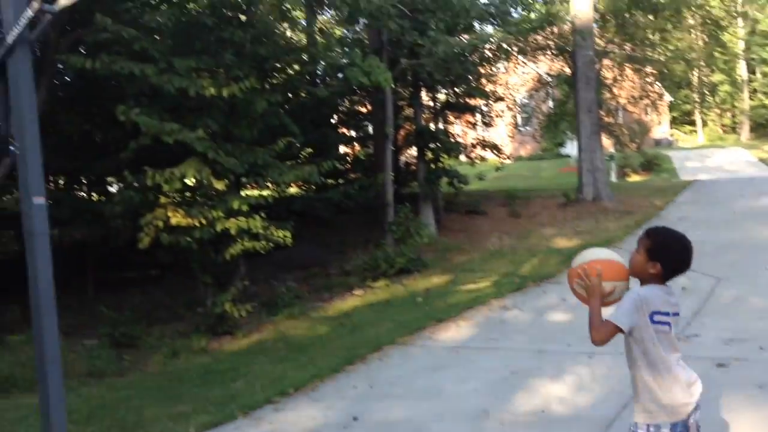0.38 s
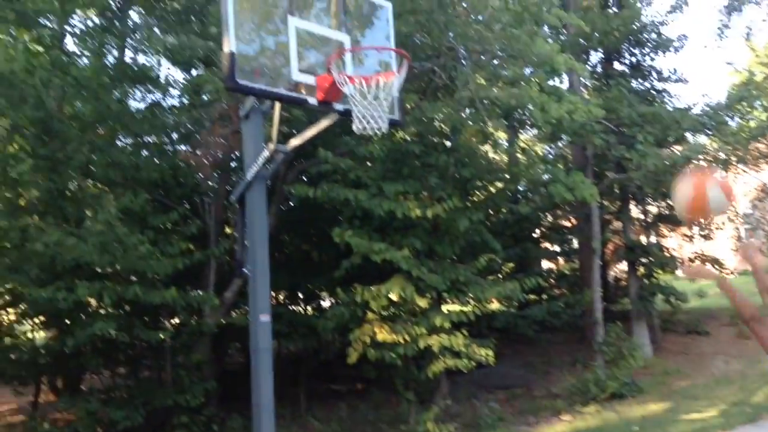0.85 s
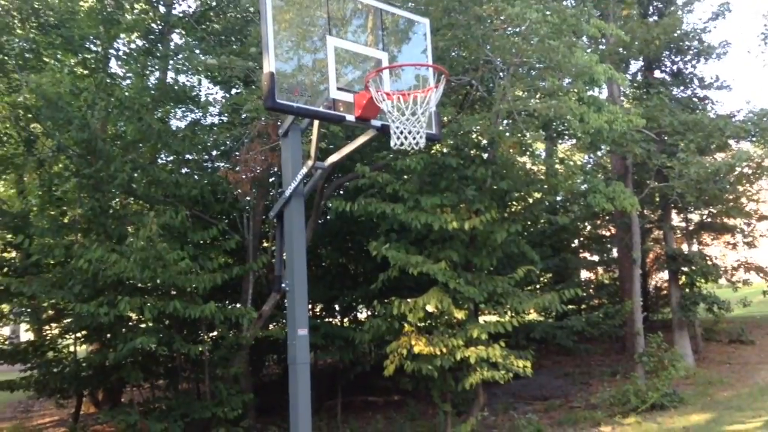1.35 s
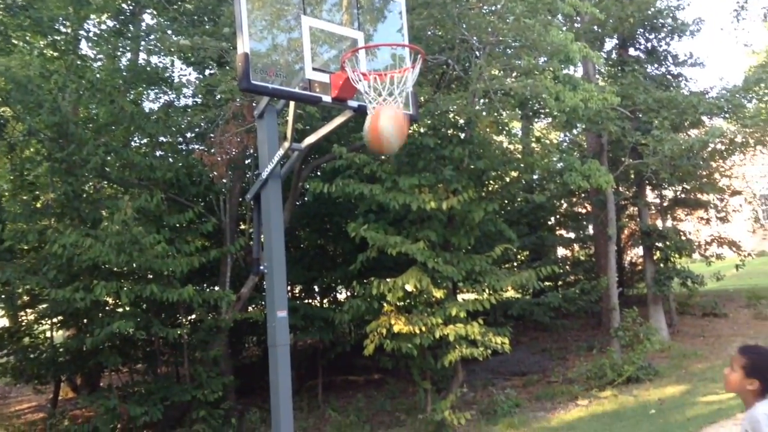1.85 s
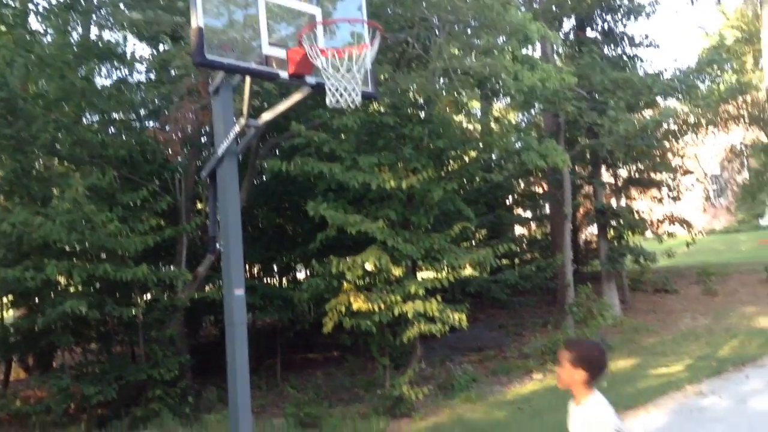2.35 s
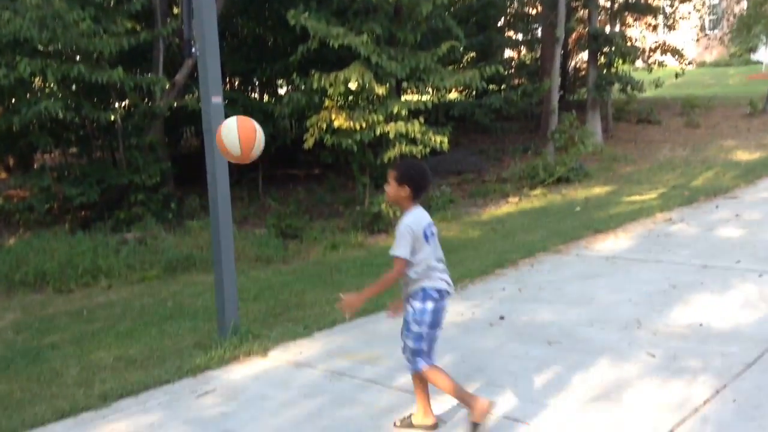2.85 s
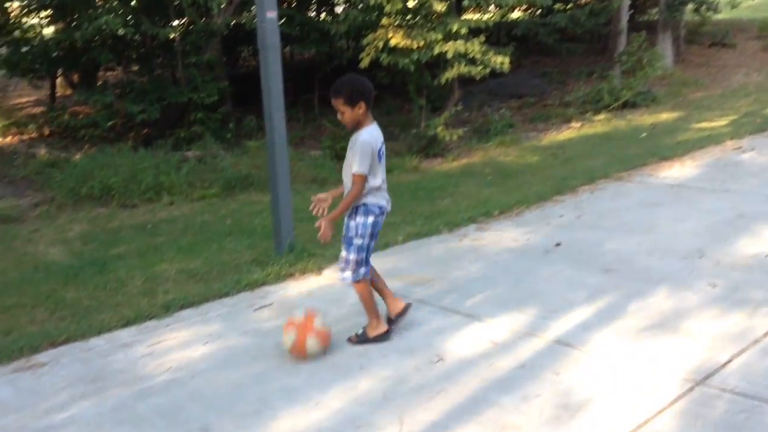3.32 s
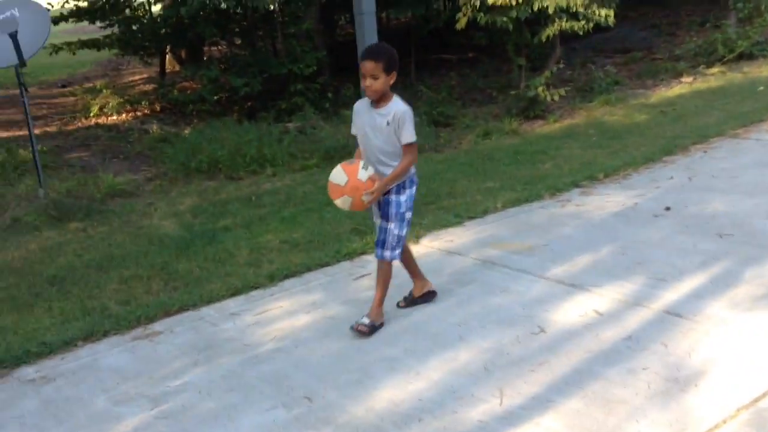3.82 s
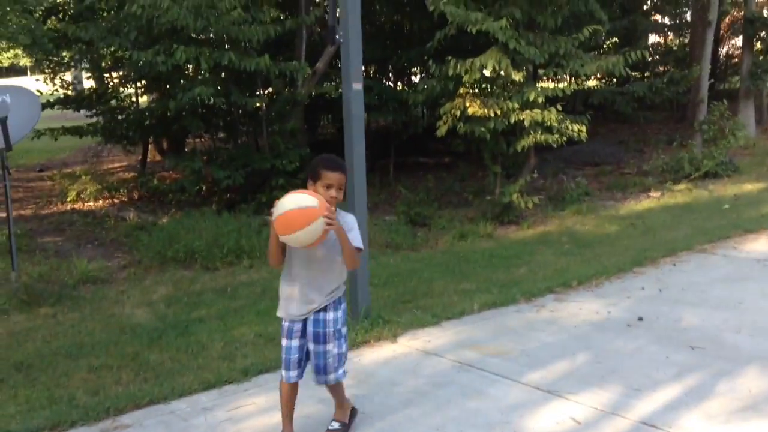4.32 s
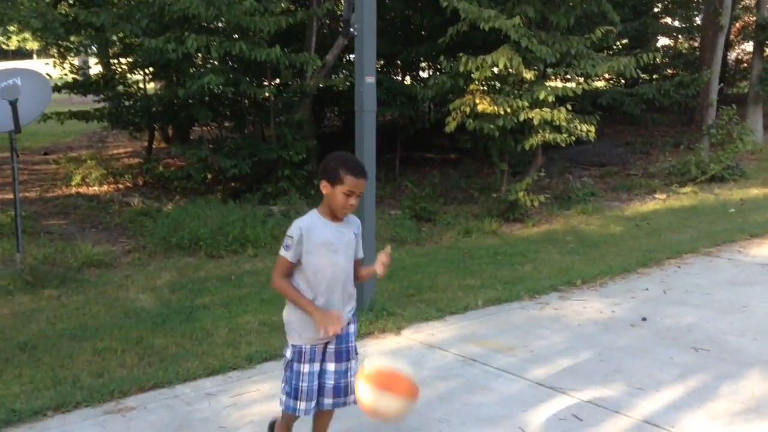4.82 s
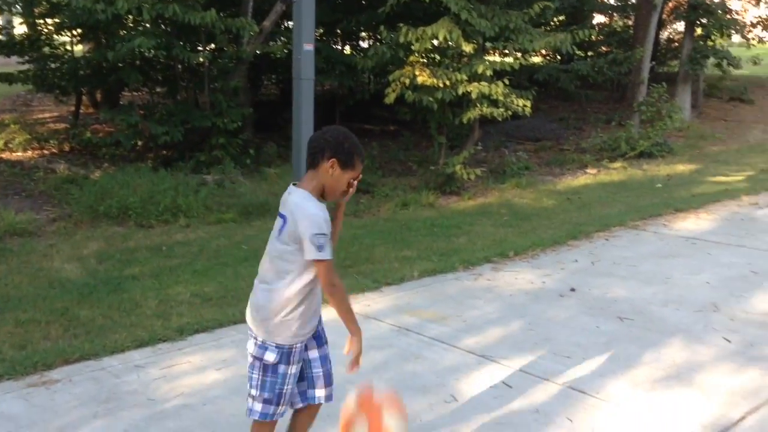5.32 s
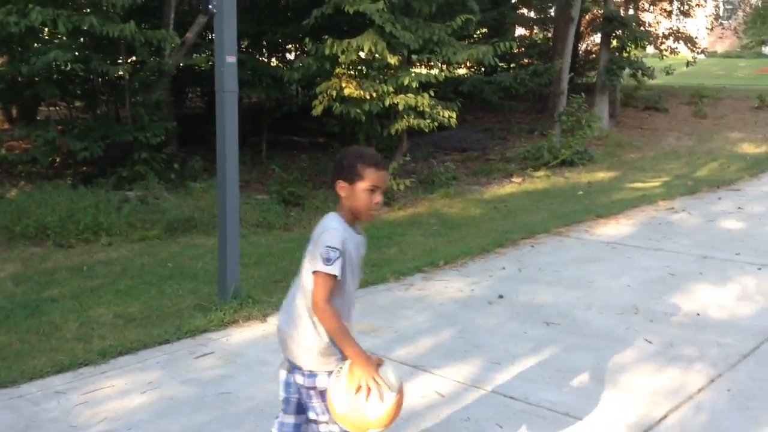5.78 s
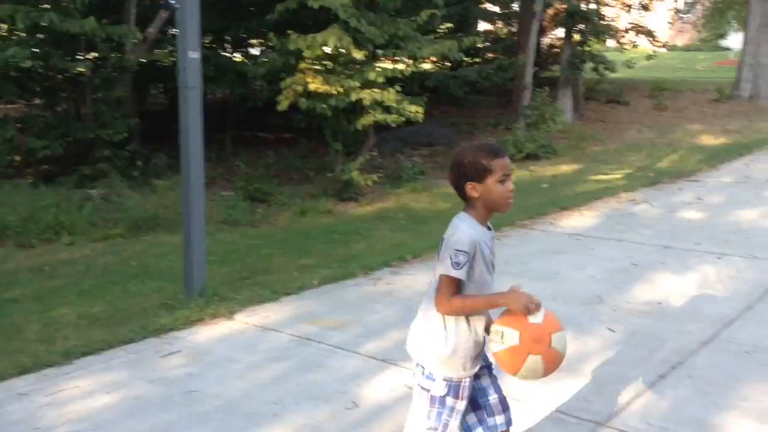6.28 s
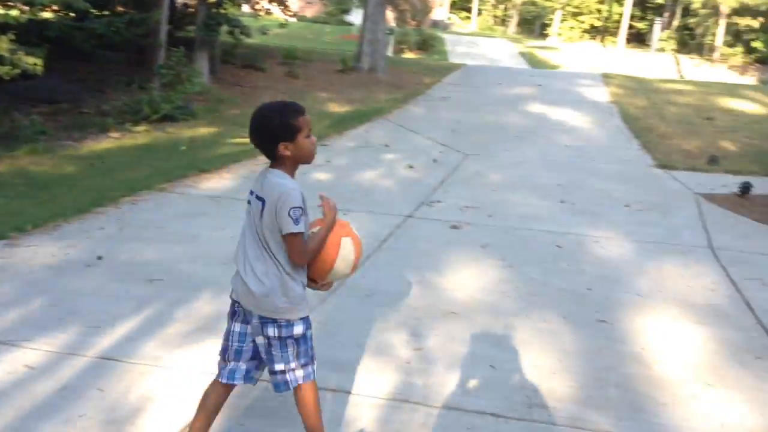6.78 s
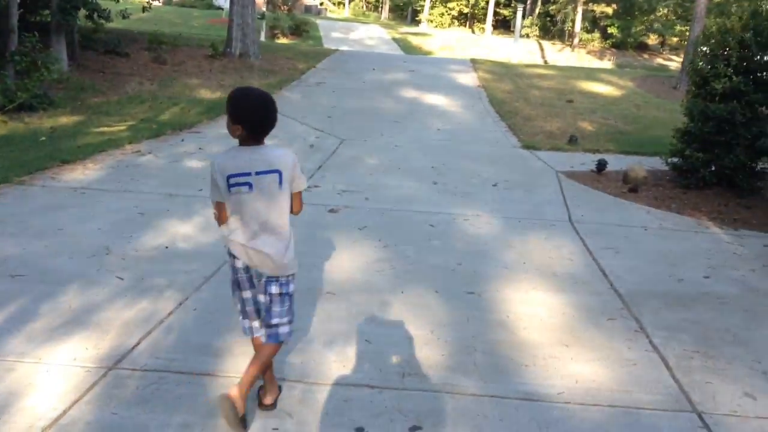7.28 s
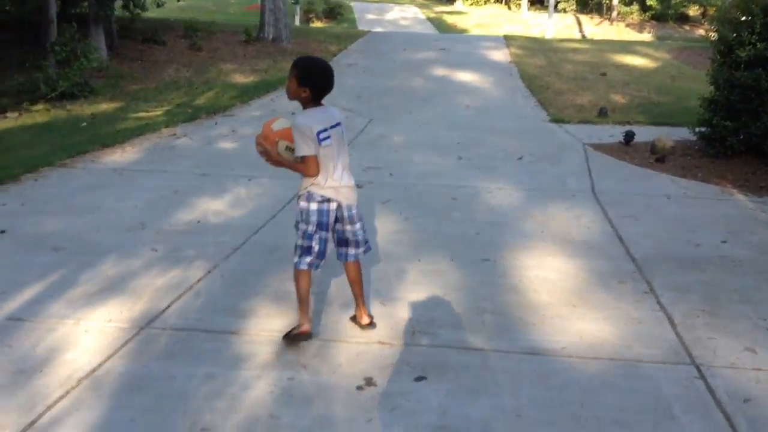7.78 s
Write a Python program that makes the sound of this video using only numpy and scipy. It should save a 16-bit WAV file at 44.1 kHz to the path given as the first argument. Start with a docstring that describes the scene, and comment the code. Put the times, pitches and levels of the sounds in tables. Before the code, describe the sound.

Sandal claps and gritty shuffles open the scene, before a bouncing rubber ball cracks on concrete, pinging hollowly. Two bounces come about a second apart, then two closer together after more steps; only footwork follows. Each hit has a slap-back off a nearby wall and a thin airy tail from trees. Faint traffic, rustling leaves, insects and distant gliding whistles remain underneath, heard through a small, bright, bass-light microphone.

```python
"""Ball and sandals on a drive

A rubber ball bounces on a concrete drive: spikes, fizz and ringing modes of its air and shell.
Loose sandals slap (ticks and hollow claps) and scuff (grainy hiss) between the bounces.
The house wall gives one echo, the yard and trees a longer noise tail; faint high tones follow some bounces.
Behind lie shaped noise for far traffic, leaves and insects, and a distant bird's gliding whistles."""
import sys
import numpy as np
from scipy import signal
from scipy.fft import rfft, irfft, next_fast_len
from scipy.io import wavfile
from scipy.ndimage import map_coordinates

SR = 44100
rng = np.random.default_rng(int(sys.argv[2]) if len(sys.argv) > 2 else 0)


def linear_from_db(decibels):
    """Turn decibels (scalar or array-like) into linear amplitude factors; 0 gives 1."""
    return 10 ** (np.asarray(decibels, float) / 20)


def to_wav(sig):
    """Store sig (one row per channel, or 1-D mono) as 16-bit WAV at the path in sys.argv[1].

    Samples outside -1..1 are clipped; the rate is SR.
    """
    pcm = np.clip(np.atleast_2d(sig), -1, 1) * 32767
    pcm = np.round(pcm).astype(np.int16)
    wavfile.write(sys.argv[1], SR, pcm.T)  # frames by channels


N = 348047  # length in samples

# Noise colours of far traffic and of leaves with insects, relative density: f/Hz, level/dB
TRAFFIC_COLOUR = [(12, -80), (20, -50), (32, -45), (48, -15.5), (81, -45), (102, -7.5), (162, -7.5),
                  (193, -6), (237, -1), (298, -6.5), (360, -7), (420, -15.5), (550, -43), (920, -120)]
LEAVES_COLOUR = [(280, -22), (480, -1.5), (539, -2.5), (596, -2), (1370, -2), (1500, -8), (1750, -4.5),
                 (2660, -10), (2900, -6), (3120, -11), (3450, -8.5), (6600, -11.5), (7620, -4),
                 (15000, -24)]
# Ambience levels before their small wobble: t/s, traffic level/dB, leaves and insects level/dB
AMBIENCE_LEVELS = [(0, -48, -46.5), (2, -48.5, -47), (4, -47.5, -47), (6, -47.5, -47), (7.3, -47.5, -46.5),
                   (7.89, -47, -47)]
# Bird whistles, nominal level before the fuzz: t/s, length/s, from f/Hz, to f/Hz, level/dB
BIRD_WHISTLES = [(0.335, 0.31, 3900, 2840, -55), (1.78, 0.37, 3900, 2600, -54),
                 (7.26, 0.355, 2900, 2960, -58.5), (7.47, .06, 3200, 3500, -55),
                 (7.6, .07, 4000, 4400, -54)]
# Faint high tones after a bounce, level before its wobble: from t/s, to t/s, f/Hz, level/dB
THIN_TONES = [(2.517, 2.774, 2930, -53), (4.84, 5.2, 2230, -51), (5.5, 5.755, 2245, -59)]
# Soles dragging on grit, nominal level; weight lifts the low part: t/s, level/dB, rise/s, hold/s, weight/dB
SCUFF_STROKES = [(0.221, -37, 0.019, 0.023, 8.5), (0.573, -36.5, .003, 0.01, 5),
                 (0.636, -27, 0.012, 0.014, -5.5), (0.818, -50, .0055, .015, 7),
                 (1.183, -56, .0044, 0.026, 11), (1.228, -44, .005, 0.024, 2),
                 (1.625, -39.5, 0.045, 0.021, 3), (2.646, -42.5, .01, 0.09, -0.5),
                 (3.114, -36, 0.025, 0.021, 0), (3.514, -35.5, 0.01, 0.025, 3),
                 (3.864, -42, .004, 0.028, -15), (4.273, -39.5, .011, 0.034, 2.5),
                 (4.637, -30, 0.024, 0.011, 2.5), (5.039, -27.5, 0.015, 0.034, 4.5),
                 (5.441, -27.5, .0023, 0.015, 6), (5.776, -47, .035, .02, 3),
                 (5.845, -35.5, .0045, 0.034, -1), (6.31, -39.5, .012, 0.032, -4),
                 (6.771, -36.5, .015, 0.059, -1), (7.207, -31.5, .004, 0.049, -2.5),
                 (7.655, -44, .01, .03, 0.5), (7.727, -45.5, 0.03, 0.076, 4.5)]
# Noise colour of crushed grit, relative density: f/Hz, level/dB
GRIT_COLOUR = [(880, -19), (1500, -13.5), (2550, -6), (2810, -9), (3430, -6.5), (5780, -6.5), (9360, 1.5),
               (15000, -12.5)]
# Soles hitting heel or ground, and one low thud of the ball at 2.677 s:
# t/s, nominal tick peak level/dB, clap peak level/dB, clap pitch f/Hz
TAP_HITS = [(0.2268, -24.5, -31, 3400), (.575, -30, -26.5, 527), (0.5812, -10.5, -12.5, 2040),
            (.638, -33, -33, 440), (0.829, -31, -31.5, 3700), (1.186, -27, -32, 1100),
            (1.215, -42, -30, 486), (1.2223, -13, -15, 1800), (1.7467, -31.5, -45, 3700),
            (2.289, -31, -50, 4500), (2.6524, -21.5, -36, 3500), (2.67, -22, -27, 2200),
            (2.677, -45, -26, 236), (2.7126, -23, -29.5, 4500), (3.0865, -18, -25, 4030),
            (3.1138, -27, -50, 4000), (3.668, -29, -43, 4000), (3.8666, -23, -47, 4000),
            (4.2623, -26, -34, 3600), (4.284, -22.5, -32, 3650), (4.307, -22, -22, 3780),
            (4.4533, -29.5, -47, 1800), (4.6414, -21.5, -31, 3500), (5.04, -13.5, -15.5, 4120),
            (5.26, -38, -36, 705), (5.8256, -24, -28.5, 4040), (5.8524, -24, -28, 4040),
            (6.2909, -17, -32.5, 1300), (6.3095, -17.5, -28.5, 4500), (6.4118, -26.5, -47, 4500),
            (6.754, -16, -25, 3460), (6.772, -35, -29, 5000), (6.7816, -22, -23.5, 4230),
            (6.8394, -22, -35, 3500), (7.208, -24, -35.5, 1050), (7.2504, -29, -46, 4000),
            (7.77, -45, -37, 1300), (7.81, -45, -36, 1100)]
# Noise colour of the tick, relative density: f/Hz, level/dB
TICK_COLOUR = [(1200, -52), (2500, -29), (5000, -12.5), (9000, 8), (12000, -1), (15000, -12), (20000, -40)]
# Cupped air under the sole: pitch/ratio to clap pitch, bandwidth/ratio to clap pitch, level/dB
SOLE_CUP = [(.55, 0.26, -3), (1, 0.49, 8), (1.55, 0.95, -11.5)]
# Wall echo of the taps as the feet move about: t/s, level/dB
FEET_ECHO_LEVELS = [(0, -7.5), (1.3, -4.5), (1.7, -16), (4.3, -24), (7.89, -21)]
# Bounces: landing t/s, slap level/dB, contact/s, landing shell thump level/dB, lift-off air ring level/dB
BALL_BOUNCES = [(2.3284, 2.5, .0143, -12, -4.5), (3.3857, 1.5, 0.011, -22, -19),
                (4.7709, 0, .0133, -16.5, -12.5), (5.45, -3, 0.014, -15, -22)]
# Ringing modes of the air inside the ball, relative level: f/Hz, level/dB, t60/s
AIR_MODES = [(590, -4.5, 0.026), (760, 0, 0.013), (836, 2, 0.018), (1001, -12, .13), (1037, 3, 0.024),
             (957, -29, 0.14), (1152, -9.5, 0.068), (1310, -1, 0.039), (1520, -13, 0.016),
             (1740, -12, 0.028), (2540, -15, 0.014)]
# Ringing modes of the rubber shell, relative level: f/Hz, level/dB, t60/s
SHELL_MODES = [(111, -6, 0.044), (180.3, -6.5, 0.11), (227.4, 3, 0.062), (313, 8, 0.022), (400, 1.5, 0.05),
               (500, -3.5, 0.025)]
# Noise colour of the fizz with a slap, relative density: f/Hz, level/dB
FIZZ_COLOUR = [(880, -62), (1500, 11.5), (5300, 4.5), (6810, 4), (7790, 12.5), (8830, -6.5), (10400, 11.5),
               (15000, -69)]
# Diffuse yard tail, relative level: f/Hz, t60/s, level/dB
YARD_BANDS = [(150, 0.99, -16.5), (400, 0.36, -14), (1010, 0.75, -16.5), (1590, 0.59, -11.5),
              (2930, 0.62, -7), (7800, 0.56, -9), (15000, 0.4, -6)]
# Late echoes from the trees, relative level: delay t/s, level/dB
TREE_ECHOES = [(.125, -35.5), (0.142, -40), (.152, -28.5)]

GLIDE_BEND, SWELL_POWER = 0.72, 0.48  # exponents: glide slows towards the end; roundness of the swell
SCUFF_FADE_S = 0.15  # t60 as the sole lifts
TICK_DB = -5.5  # rms of the tick under its nominal peak
CLAP_S, CLAP_CYCLES = 0.012, 2.7  # t60 of a clap: a shortest time plus some cycles of its pitch
WALL_S, WALL_DB, FEET_WALL_S = .0203, -6.5, .0168  # wall echo: ball delay and level, tap delay
SQUASH_SHARE = .45  # deepest squash, as a share of the contact time
LAND_AIR_DB, SQUASH_AIR_DB = -24.5, -22  # air ring under the slap
SQUASH_THUMP_DB = -4  # squash thump under the landing thump
LIFT_SLAP_DB, LIFT_THUMP_DB = -7, -7  # peel-off slap and shell under the lift-off air ring
FIZZ_DB = -15  # fizz under its slap
SPIKE_HZ, SPIKE_T60_S = 8800, .0012  # air squeezed from the contact patch whistles briefly
SPIKE_RING, SPIKE_PUSH = 1.69, -1.08  # gains of the whistle and of the suction pulse under it
TREES_TOP_HZ = 3200  # foliage dulls the late echoes above this


def unit(x):
    """Scales to rms 1."""
    return x / np.sqrt(np.mean(x ** 2) + 1e-20)


def along(points, hz):
    """Reads a curve of (Hz, value) points on a log frequency axis."""
    f, v = np.transpose(points)
    return np.interp(np.log(hz + 1), np.log(f + 1), v)


def filtered(x, response):
    """Filters x by a response given as a function of frequency."""
    m = next_fast_len(len(x) + 8192)
    spectrum = rfft(x, m) * response(np.fft.rfftfreq(m, 1 / SR))
    return irfft(spectrum, m)[:len(x)]


def noise(colour, size=N):
    """Coloured noise of rms 1."""
    white = rng.standard_normal(size)
    return unit(filtered(white, lambda hz: linear_from_db(along(colour, hz))))


def wobble(rate):
    """A smooth random curve through rate knots a second."""
    knots = rng.standard_normal(int(N * rate / SR) + 4)
    return map_coordinates(knots, [np.arange(N) * rate / SR])


def add(track, s, sound):
    """Mixes a sound into the track at s seconds."""
    part = track[round(s * SR):][:len(sound)]
    part += sound[:len(part)]


def ring(modes, t, scatter_db, attack):
    """Decaying modes, struck at slightly new strengths and phases each time."""
    tones = np.zeros(len(t))
    for hz, db, t60 in modes:
        decay = linear_from_db(db + scatter_db * rng.normal() - 60 * t / t60)
        tones += decay * np.sin(2 * np.pi * hz * t + 0.56 * rng.normal())
    return tones * (1 - np.exp(-t / attack))


def ambience():
    """Low traffic drone that swells unevenly, under a smooth hiss of leaves and insects."""
    t = np.arange(N) / SR
    s, traffic_db, leaves_db = np.transpose(AMBIENCE_LEVELS)
    drone = linear_from_db(np.interp(t, s, traffic_db) + 0.32 * wobble(11.0)) * noise(TRAFFIC_COLOUR)
    hiss = linear_from_db(np.interp(t, s, leaves_db) + 0.082 * wobble(4.29)) * noise(LEAVES_COLOUR)
    return drone + hiss


def bird():
    """Far gliding whistles, smeared by the trees into a fuzzy band."""
    out, t = np.zeros(N), np.arange(N) / SR
    for s, length, from_hz, to_hz, db in BIRD_WHISTLES:
        done = np.clip((t - s) / length, 0, 1)
        glide_hz = from_hz + (to_hz - from_hz) * done ** GLIDE_BEND
        phase = 2 * np.pi * np.cumsum(glide_hz) / SR
        swell = linear_from_db(db) * np.abs(np.sin(np.pi * done)) ** SWELL_POWER * (done < 1)
        # random weights on both quadratures widen the tone into a band
        out += swell * (wobble(330) * np.sin(phase) + wobble(330) * np.cos(phase))
    return out


def thin_tones():
    """Faint pure tones, wavering in level and phase, that swell and fade after some bounces."""
    out, t = np.zeros(N), np.arange(N) / SR
    for start, end, hz, db in THIN_TONES:
        done = np.clip((t - start) / (end - start), 0, 1)
        swell = np.sin(np.pi * done) ** .5
        tone = np.sin(2 * np.pi * hz * t + .6 * wobble(30))
        out += linear_from_db(db + 3.2 * wobble(30)) * swell * tone
    return out


def scuffs():
    """Grit crushed under a dragging sole: hiss with spiky grains; weight sets its low part."""
    bright, heavy, t = np.zeros(N), np.zeros(N), np.arange(SR // 2) / SR
    for s, db, rise, hold, weight_db in SCUFF_STROKES:
        fade = linear_from_db(db - 60 * np.maximum(t - rise - hold, 0) / SCUFF_FADE_S)
        stroke = fade * np.minimum(t / rise, 1)
        add(bright, s, stroke)
        add(heavy, s, stroke * linear_from_db(weight_db))
    grains = linear_from_db(3.3 * wobble(1500) + 1.5 * wobble(120))
    hiss = noise(GRIT_COLOUR)
    low = filtered(hiss, lambda hz: 1 / (1 + (hz / 5500) ** 6))
    return (bright * (hiss - low) + heavy * low) * unit(grains)


def sole_cup(f, pitch):
    """Response of the air cupped under a sole: resonances of alternating sign, dulled above."""
    total = 0
    for k, (ratio, width, db) in enumerate(SOLE_CUP):
        damping = 1j * f * width
        total = total + (-1) ** k * linear_from_db(db) * damping / (pitch * ratio ** 2 - f * f / pitch + damping)
    return total / (1 + 1j * f / (2.0 * pitch)) ** 2


def taps():
    """Sandal slaps, and one ball thud made alike: a gritty tick plus a hollow clap, echoed by the wall."""
    out, t = np.zeros(N), np.arange(SR // 20) / SR
    for s, tick_db, clap_db, pitch in TAP_HITS:
        tick_shape = linear_from_db(tick_db + TICK_DB - 60 * t / 0.016) * np.minimum(t / 0.00088, 1)
        tick = tick_shape * noise(TICK_COLOUR, size=len(t))
        burst = linear_from_db(-60 * t / (CLAP_S + CLAP_CYCLES / pitch)) * rng.standard_normal(len(t))
        clap = filtered(burst, lambda f: sole_cup(f, pitch))
        tap = tick + linear_from_db(clap_db) * clap / np.abs(clap).max()
        echo_db = np.interp(s, *np.transpose(FEET_ECHO_LEVELS))
        add(out, s, tap)
        add(out, s + FEET_WALL_S, linear_from_db(echo_db) * tap)
    return out


def ball():
    """Landing and lift-off send a spike and fizz; they and the squash ring the air and shell."""
    body, fizz, t = np.zeros(N), np.zeros(N), np.arange(SR) / SR
    suction = SPIKE_PUSH * t / .00004 * np.exp(1 - t / .00004)
    whistle = SPIKE_RING * ring([(SPIKE_HZ, 0, SPIKE_T60_S)], t, scatter_db=3, attack=.0001)
    spike = suction + whistle
    for land, db, contact, thump, lift_db in BALL_BOUNCES:
        squash = land + SQUASH_SHARE * contact
        # time, slap dB, air ring dB, shell thump dB; the squash has no slap
        stages = [(land, db, db + LAND_AIR_DB, thump),
                  (squash, -np.inf, db + SQUASH_AIR_DB, thump + SQUASH_THUMP_DB),
                  (land + contact, lift_db + LIFT_SLAP_DB, lift_db, lift_db + LIFT_THUMP_DB)]
        for s, slap_db, air_db, thump_db in stages:
            fizz_decay = linear_from_db(slap_db + FIZZ_DB - 60 * t / 0.014)
            add(fizz, s + 0.00024, fizz_decay * noise(FIZZ_COLOUR, size=SR))
            air = linear_from_db(air_db) * ring(AIR_MODES, t, scatter_db=2.5, attack=0.00054)
            shell = linear_from_db(thump_db) * ring(SHELL_MODES, t, scatter_db=1.5, attack=0.0021)
            add(body, s, linear_from_db(slap_db) * spike + air + shell)
    wall = round(WALL_S * SR)
    return [x + linear_from_db(WALL_DB) * np.pad(x, (wall, 0))[:N] for x in (body, fizz)]


def yard(x, tail_db, trees_db):
    """A diffuse tail whose bands die at their own speed, with smeared echoes off trunks."""
    hz, t, z = signal.stft(unit(rng.standard_normal(SR)) / np.sqrt(SR), SR, nperseg=256)
    t60 = along([(f, decay) for f, decay, _ in YARD_BANDS], hz)[:, None]
    level_db = along([(f, db) for f, _, db in YARD_BANDS], hz)[:, None]
    even_energy = np.sqrt(6 * np.log(10) / t60)  # makes the level independent of the decay time
    shaped = z * linear_from_db(level_db - 60 * t / t60) * even_energy
    tail = signal.istft(shaped, SR, nperseg=256)[1][:SR]
    answer = linear_from_db(tail_db) * np.pad(tail, (round(0.014 * SR), 0))[:SR]
    smear_t = np.arange(SR // 20) / SR
    for delay, db in TREE_ECHOES:
        smear = noise([(TREES_TOP_HZ, 0), (20000, -24)], size=SR // 20) * linear_from_db(-60 * smear_t / 0.026)
        add(answer, delay, linear_from_db(db + trees_db) * smear / np.linalg.norm(smear))
    return signal.fftconvolve(x, answer)[:N]


def scene():
    """Ball, taps and scuffs in the yard over the ambience; each bounce gets a fresh yard response."""
    body, fizz = ball()
    steps = taps() + scuffs()
    slot = np.floor(np.arange(N) / SR - .3)  # one-second slots, one bounce in each used below
    wet = yard(steps, tail_db=-3.5, trees_db=0.0)
    for k in (2, 3, 4, 5):
        wet += yard(body * (slot == k), tail_db=0.4, trees_db=1.0)
    mix = body + fizz + steps + wet + thin_tones() + bird() + ambience()
    return mix[None]


def band_limit(x):
    """A steep low-pass at the top of the band."""
    return signal.sosfilt(signal.butter(12, 16480, fs=SR, output="sos"), x)


def record(dry):
    """The small microphone drops the deep bass and cannot pass full scale; little is left above 15.3 kHz."""
    def response(hz):
        bass_cut = (1j * hz / (1j * hz + 70)) ** 2
        nearly_empty_top = np.where(hz < 15300, 1, linear_from_db(-27))
        return bass_cut * nearly_empty_top
    mix = np.clip(filtered(dry[0], response), -1, 1)[None]
    return band_limit(mix)


dry = scene()
out = record(dry)
to_wav(out)
```